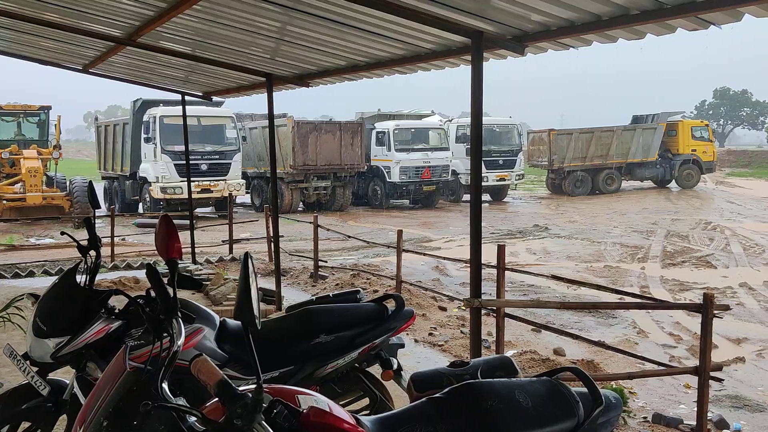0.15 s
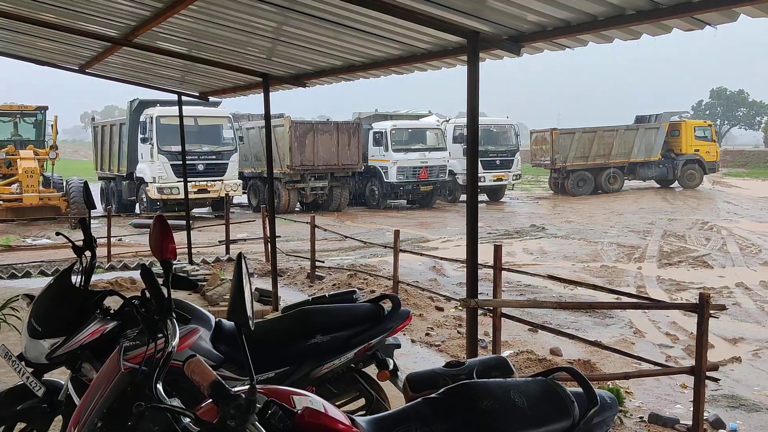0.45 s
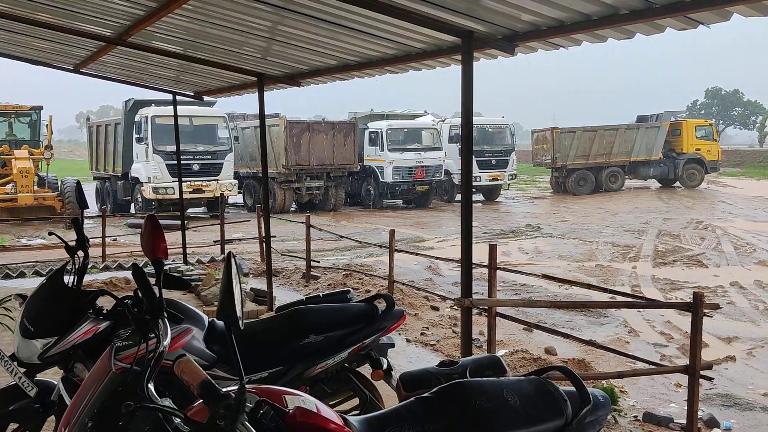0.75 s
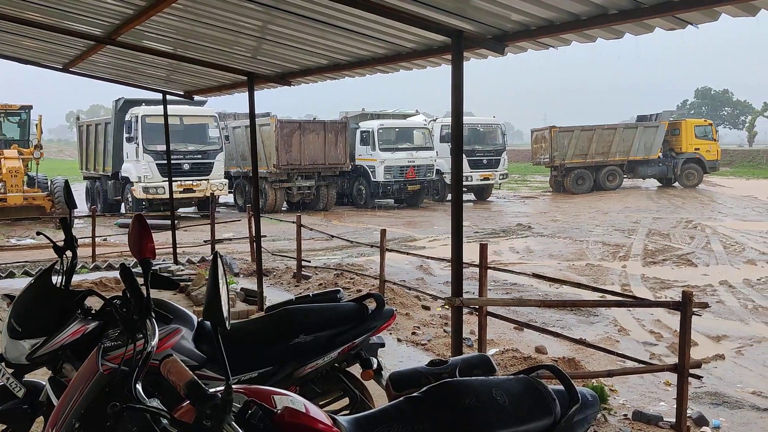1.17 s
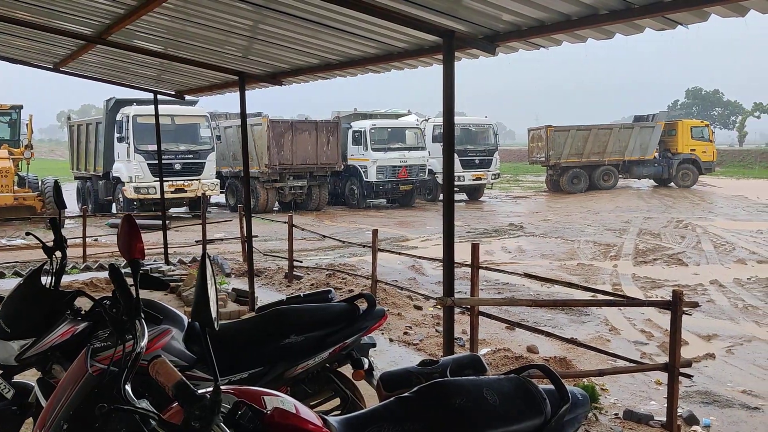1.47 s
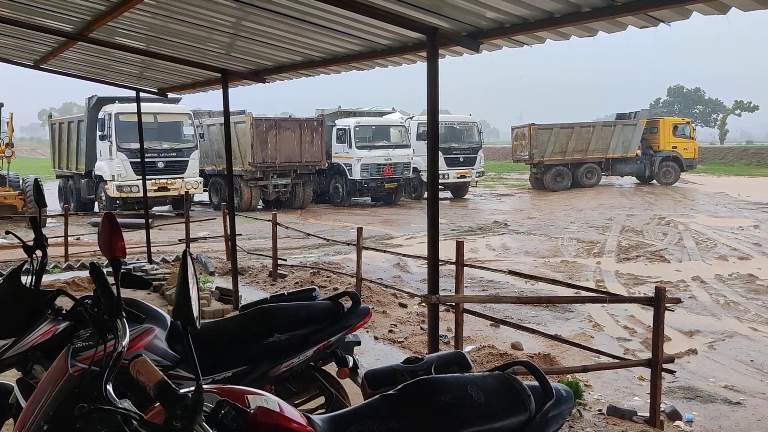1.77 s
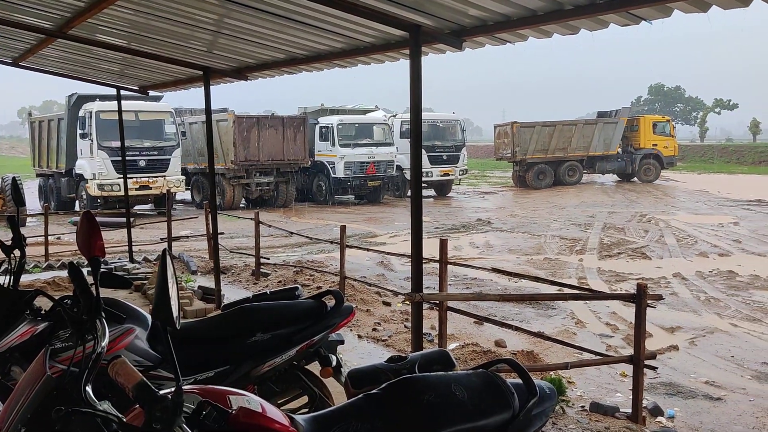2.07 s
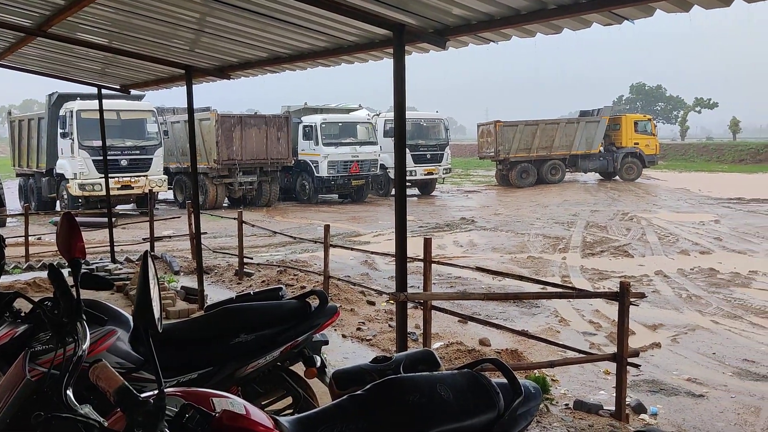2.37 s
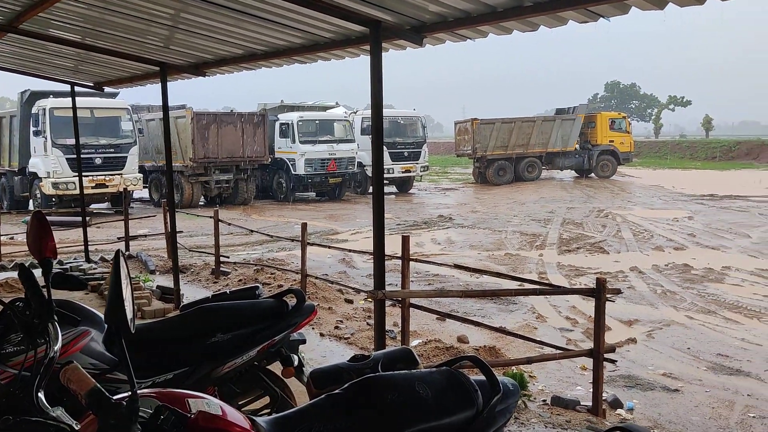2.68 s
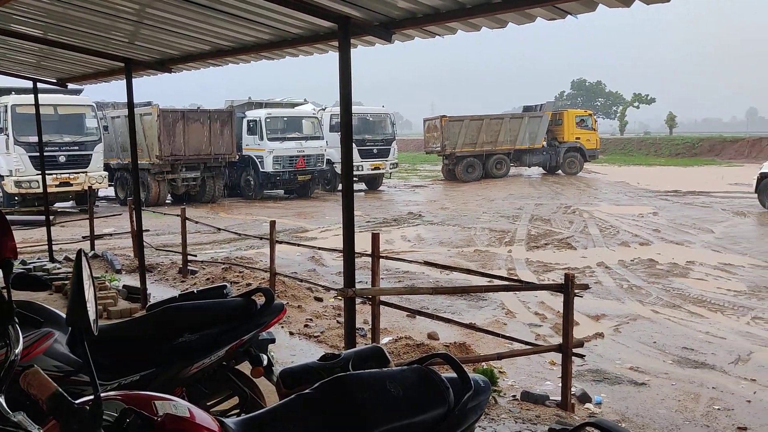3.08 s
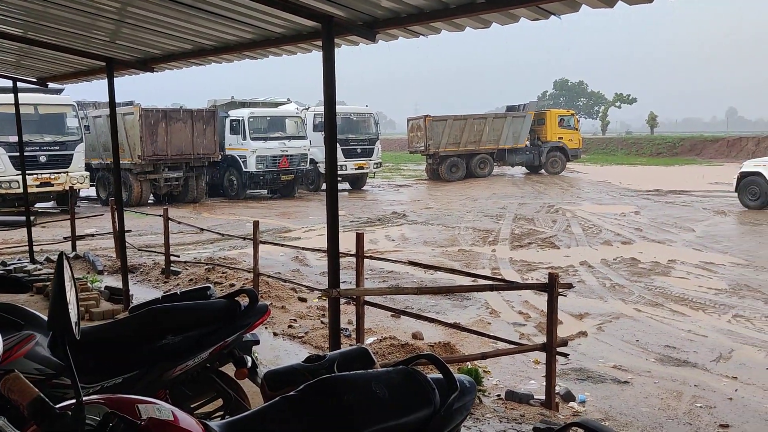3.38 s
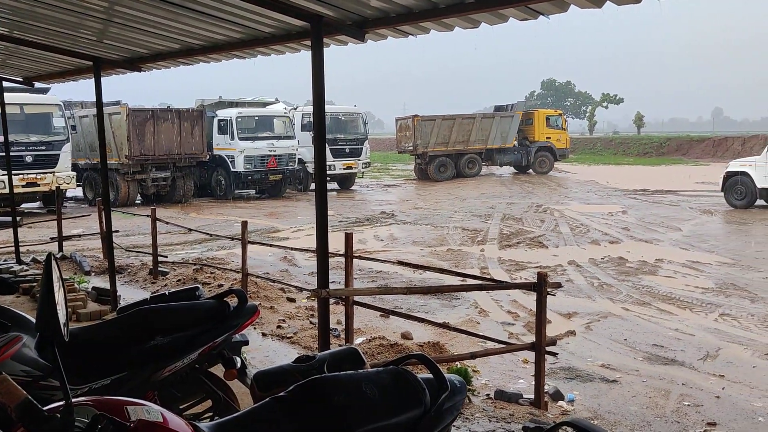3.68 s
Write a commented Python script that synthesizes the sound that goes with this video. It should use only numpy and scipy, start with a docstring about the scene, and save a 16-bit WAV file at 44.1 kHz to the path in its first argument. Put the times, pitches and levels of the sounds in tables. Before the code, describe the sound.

Steady rain drums on a metal roof, with a faint diesel engine drone beyond.

```python
"""Steady rain drums on a sheet-metal shelter, heard from under the roof.
Countless drops set the sheets ringing; fine ticks on the muddy yard merge into a hiss,
and bigger drips burst into spray close by. Across the yard a diesel exhaust
drones over a low rumble; the engine eases off, then slows down."""
import sys
import numpy as np
from scipy import signal
from scipy.fft import rfft, irfft
from scipy.io import wavfile
from scipy.ndimage import uniform_filter1d

SR = 44100
rng = np.random.default_rng(int(sys.argv[2]) if len(sys.argv) > 2 else 0)


def waveform_to_disk(signal):
    """Save audio, clipped to [-1, 1], as 16-bit WAV at the path in sys.argv[1]."""
    frames = np.transpose(np.atleast_2d(signal))
    scaled = np.clip(frames, -1, 1) * 32767
    samples = np.round(scaled).astype(np.int16)
    wavfile.write(sys.argv[1], SR, samples)


N = 169344
T = np.arange(N) / SR
HZ = np.maximum(np.fft.rfftfreq(N, 1 / SR), 1)

# splash spectrum (frequency [Hz], relative density [dB])
SPLASH_SPECTRUM = [(800, -17), (2500, -9), (5000, 6), (7000, 0.5), (9000, -4), (13000, -1), (16000, 0)]


def undb(db):
    """Decibels to gain."""
    return 10 ** (np.asarray(db) / 20)


def unit(x):
    """Scale to rms 1."""
    return x / np.sqrt(np.mean(x ** 2))


def decay(age_s, t60_s):
    """Exponential fall, 60 dB in t60_s."""
    return np.exp(-np.log(1000) * age_s / t60_s)


def at_hz(table, hz=HZ):
    """Read a table on a log-frequency axis."""
    points, values = np.array(table, float).T
    return np.interp(np.log(hz), np.log(points), values)


def colour(x, db):
    """Minimum-phase filter, one gain per frequency bin."""
    cepstrum = irfft(np.log(undb(db)), N)
    fold = 1 + np.sign(N / 2 - np.arange(N))
    fold[0] = 1
    return irfft(rfft(x) * np.exp(rfft(cepstrum * fold)), N)


def drift(rate_hz):
    """Smooth random drift, rms 1."""
    hold = int(SR / rate_hz)
    steps = np.repeat(rng.standard_normal(N // hold + 1), hold)
    return unit(uniform_filter1d(uniform_filter1d(steps, hold), hold)[:N])


def drops(per_s, spread_db, max_spreads=4.43):
    """Impacts at random moments, many small, a few large."""
    hits = rng.random(N) < per_s / SR
    sizes = undb(spread_db * np.minimum(rng.exponential(size=N), max_spreads))
    return unit(hits * sizes * rng.choice([-1, 1], N))


def ring(impacts, t60_s, tail_db):
    """Add a diffuse tail to each impact; ten spots ring differently."""
    spot = rng.integers(0, 10, N)
    out = impacts
    for k in range(10):
        tail = rng.standard_normal(SR // 2) * decay(T[:SR // 2], t60_s)
        tail /= np.linalg.norm(tail)
        out = out + undb(tail_db) * signal.fftconvolve(impacts * (spot == k), tail)[:N]
    return unit(out)


def surround(pair, db):
    """Colour two independent signals into stereo, rms 1: alike in the bass, apart in the treble."""
    # left-right likeness (frequency [Hz], correlation [-])
    likeness = [(150, 0.93), (420, 0.92), (640, 0.29), (760, 0.68), (950, 0.41), (1250, -0.24),
                (1850, -0.26), (2300, 0.18), (2800, 0.025), (3500, 0.02), (16000, -0.075)]
    # balance (frequency [Hz], right over left [dB])
    balance = [(200, -1), (450, -0.6), (650, -1.5), (1000, 0.7), (1500, 2), (1900, 3.5), (2400, 6),
               (3400, 4), (4500, 2.5), (6300, 1), (7300, -1.5), (9000, .3), (12000, 1.7), (16000, 3.5)]
    correlation, right_db = at_hz(likeness), at_hz(balance)
    mid = colour(pair[0] + pair[1], 10 * np.log10(1 + correlation))
    side = colour(pair[0] - pair[1], 10 * np.log10(1 - correlation))
    left = colour(mid + side, db - right_db / 2)
    right = colour(mid - side, db + right_db / 2)
    return unit(np.array([left, right]))


def roof():
    """Dense drops knock on the sheets, which ring briefly in broad resonances."""
    # drumming spectrum (frequency [Hz], relative density [dB])
    spectrum = [(60, -15), (200, -1.5), (320, -3), (450, 2), (630, -4), (900, -2.5), (1150, -0.5),
                (1500, 1), (2000, -0.5), (2200, -2.5), (2750, -2), (3050, -5), (4050, -6), (4500, -11.5),
                (5500, -11.5), (6700, -11.5), (7500, -19), (10000, -22.5), (16000, -29)]
    # sheet resonances (centre [Hz], width [Hz], lift [dB])
    modes = [(255.4, 17, 5), (450, 52, 2), (750, 57, 5), (973, 65, 3.5), (1078, 70, 3), (1866, 180, 2),
             (2640, 100, 0.5), (3340, 240, 3), (4100, 150, 1), (4880, 180, 3)]
    lift_db = sum(db / (1 + (2 * (HZ - hz) / width) ** 2) for hz, width, db in modes)
    knocks = [ring(drops(per_s=5000, spread_db=3), t60_s=0.061, tail_db=-0.5) for _ in range(2)]
    level_db = -26.5 + 0.31 * drift(3.77) + 0.29 * drift(18)
    return surround(knocks, at_hz(spectrum) + lift_db) * undb(level_db)


def ground():
    """Fine ticks on mud and puddles merge into a hiss, with a patter of heavier drops."""
    # hiss spectrum (frequency [Hz], relative density [dB])
    spectrum = [(300, -6), (1500, 0), (4000, -0.5), (6500, 1.5), (8000, -2), (10000, -2.5), (13300, -3.5),
                (16000, -8.5)]
    ticks = [ring(drops(per_s=5000, spread_db=2.5), t60_s=0.026, tail_db=1.5) for _ in range(2)]
    heavy = drops(per_s=55, spread_db=4.5, max_spreads=4.2)
    splats = [ring(np.roll(heavy, lag), t60_s=0.1, tail_db=5) for lag in (0, 20)]
    hiss = surround(ticks, at_hz(spectrum)) * undb(-39 + 0.43 * drift(11))
    patter = surround(splats, at_hz(SPLASH_SPECTRUM)) * undb(-49)
    return hiss + patter


def rumble():
    """Low distant rumble, nearly the same on both sides."""
    # rumble spectrum (frequency [Hz], relative density [dB])
    spectrum = [(12, -26), (22, -7.5), (30, 2), (40, -13), (55, -5.5), (72, -3), (95, -6), (120, -9),
                (165, -7), (200, -18), (300, -33.5), (600, -47)]
    mid, side = (unit(colour(rng.standard_normal(N), at_hz(spectrum))) for _ in range(2))
    return undb(-32) * (mid + undb(-18.5) * side * np.array([[1], [-1]]))


def engine():
    """Far diesel exhaust: only the firing tone and its first overtones carry across the yard."""
    # engine run (time [s], firing rate [Hz], firing tone [dB], octave [dB])
    run = [(.14, 50.4, -42, -26), (.32, 50.2, -35, -26), (.36, 51.3, -20, -20.5),
           (.72, 50.56, -26.5, -21.5), (.79, 49.56, -38, -26.5), (.84, 47.44, -32, -43),
           (.9, 46.83, -25, -45), (.98, 45.6, -30, -42), (1.1, 44.8, -25, -24), (1.6, 44.94, -27.5, -27),
           (1.95, 44.5, -27, -24), (2.28, 44.6, -26, -26.5), (2.38, 42.7, -35, -32), (2.54, 39.6, -35, -36),
           (2.7, 36.6, -37, -33), (2.9, 34, -51, -30), (3.1, 31.3, -38, -49), (3.28, 28.57, -35.5, -34),
           (3.8, 22.95, -45, -35)]
    # exhaust colour, harmonics 3-7 (frequency [Hz], level before roll-off [dB])
    exhaust = [(65, -45), (85, -36), (105, -40.5), (135, -43), (175, -43.5), (210, -46.5), (400, -63)]
    rate_jitter, waver_db, rolloff_db = 0.00816, 0.55, 5
    times_s, *tracks = np.array(run).T
    firing_hz, tone_db, octave_db = (np.interp(T, times_s, track) for track in tracks)
    phase = 2 * np.pi * np.cumsum(firing_hz * (1 + rate_jitter * drift(25.06))) / SR
    drone = undb(tone_db + waver_db * drift(25)) * np.cos(phase)
    drone += undb(octave_db + waver_db * drift(18)) * np.cos(2 * phase)
    for k in range(3, 8):
        level_db = at_hz(exhaust, k * firing_hz) - rolloff_db * (k - 3) + 1.7 * drift(15)
        drone += undb(level_db) * np.cos(k * phase + 2 * np.pi * rng.random())
    lilt = 1 + 0.15 * np.cos(phase / 2)  # strong and weak firings alternate
    return np.sqrt(2) * drone * lilt


def drips():
    """Each big drip bursts into a spray of tiny droplets, which patter down again."""
    # near drips (time [s], level [dB], spectral hump centre [Hz])
    splashes = [(0.268, -32, 8000), (0.457, -35, 14000), (0.65, -33, 13500), (.955, -37, 5000),
                (1.195, -37, 11940), (1.421, -33, 5200), (1.487, -38, 10010), (1.605, -26, 8960),
                (1.724, -35, 4500), (1.778, -36, 5000), (2.422, -29.5, 6200), (2.829, -40, 8950),
                (2.92, -36, 12160), (3.351, -37, 8050), (3.595, -37, 12900), (3.65, -37, 13000)]
    rise_s, hump_height_db, half_width_oct = 0.0035, 19, 0.76
    out = 0
    for start_s, level_db, centre_hz in splashes:
        age_s = np.maximum(T - start_s, 0)
        fallback = undb(-10) * decay(age_s, t60_s=0.32)
        envelope = (1 - np.exp(-age_s / rise_s)) * (decay(age_s, t60_s=0.12) + fallback)
        droplets = np.array([drops(per_s=4200, spread_db=0.5) for _ in range(2)])
        hump_db = hump_height_db / (1 + (np.log2(HZ / centre_hz) / half_width_oct) ** 2)
        spray = unit(colour(droplets, at_hz(SPLASH_SPECTRUM) + hump_db))
        out = out + spray * envelope * undb(level_db)
    return out


def scene():
    """Rain all around; engine and rumble slightly left."""
    rain = roof() + ground() + drips()
    pan_left = undb([[0.9], [-0.9]])
    return rain + (engine() + rumble()) * pan_left


def record(dry):
    """Quick fade-in, steep low-pass."""
    # fade-in (time [s], gain [dB])
    fade_in = [(0, -78), (.09, -63), (.102, -27), (.135, -16), (.25, -9), (.31, -4.5), (.4, -3.5),
               (.7, -0.5)]
    cutoff_hz = 15850
    faded = dry * undb(np.interp(T, *np.array(fade_in).T))
    lowpass = signal.ellip(12, 0.1, 90, cutoff_hz, fs=SR, output="sos")
    return signal.sosfilt(lowpass, faded)


dry = scene()
out = record(dry)
waveform_to_disk(out)
```